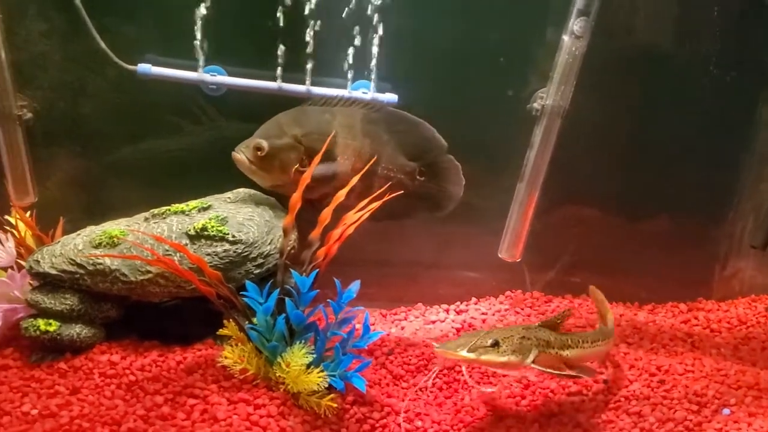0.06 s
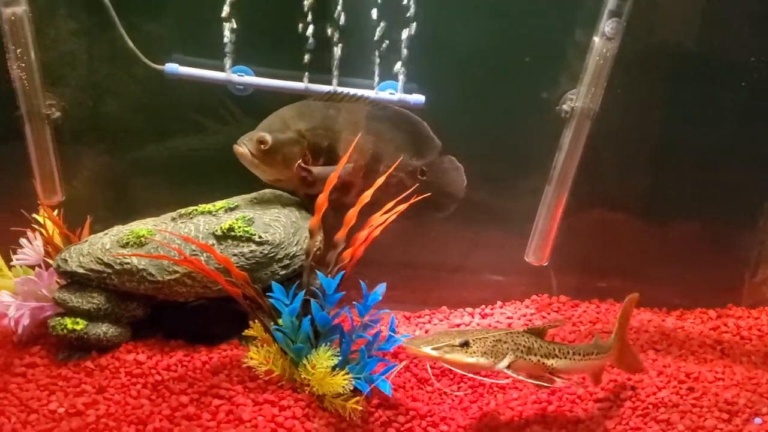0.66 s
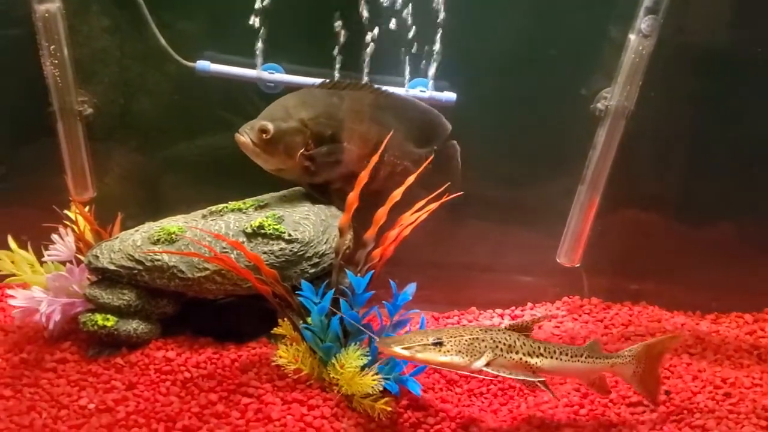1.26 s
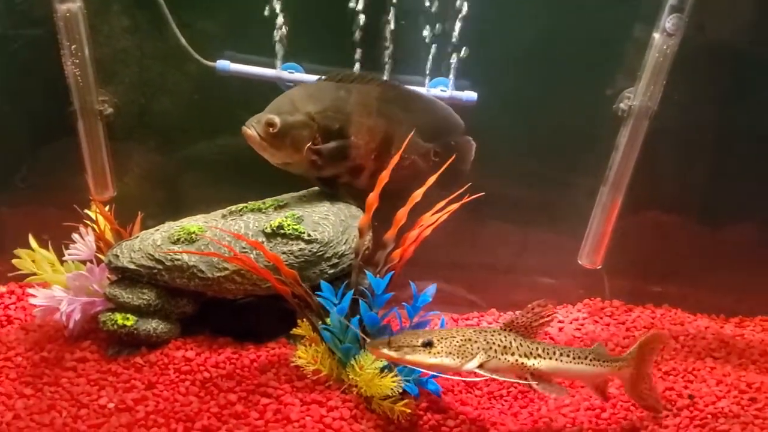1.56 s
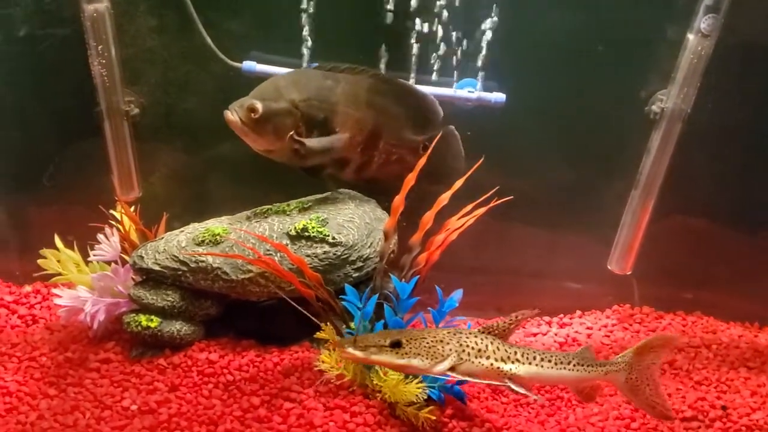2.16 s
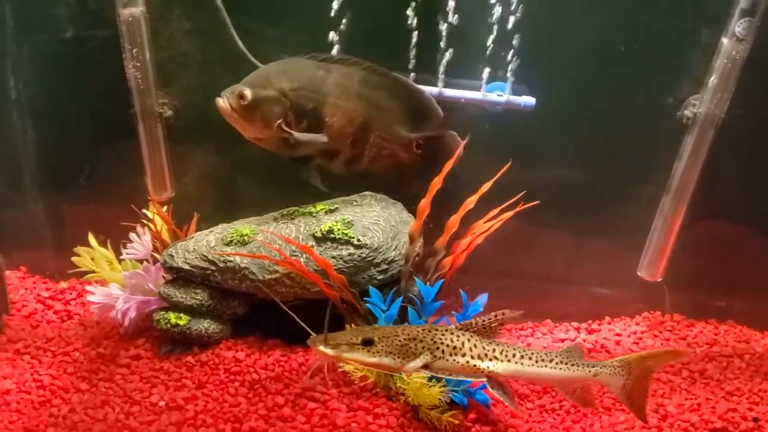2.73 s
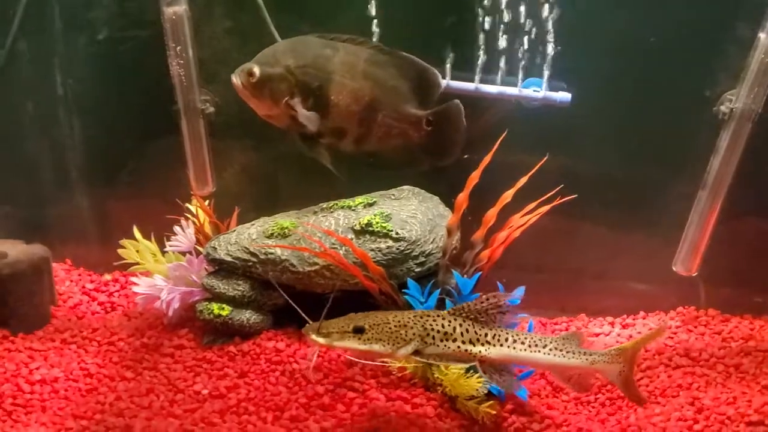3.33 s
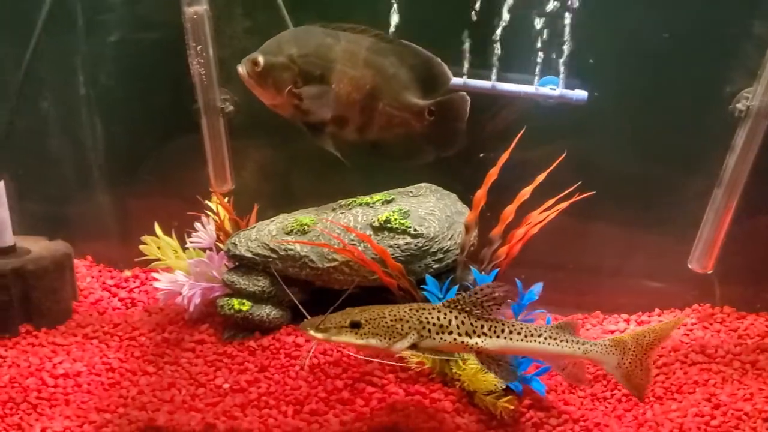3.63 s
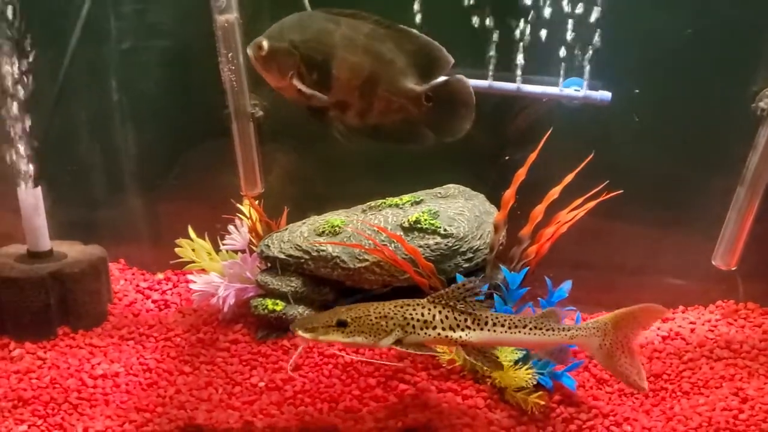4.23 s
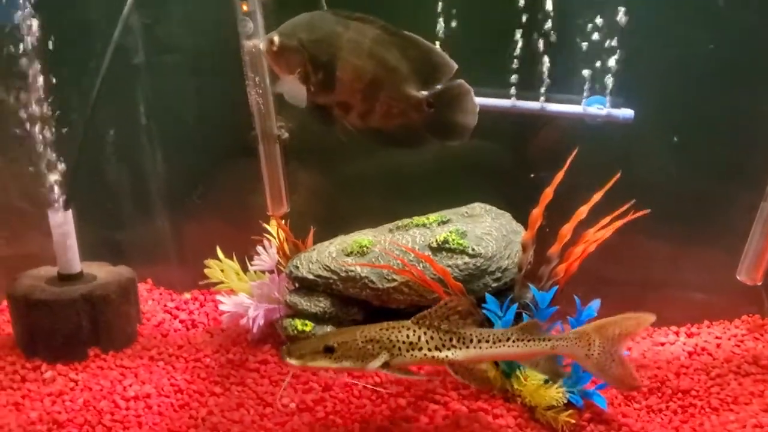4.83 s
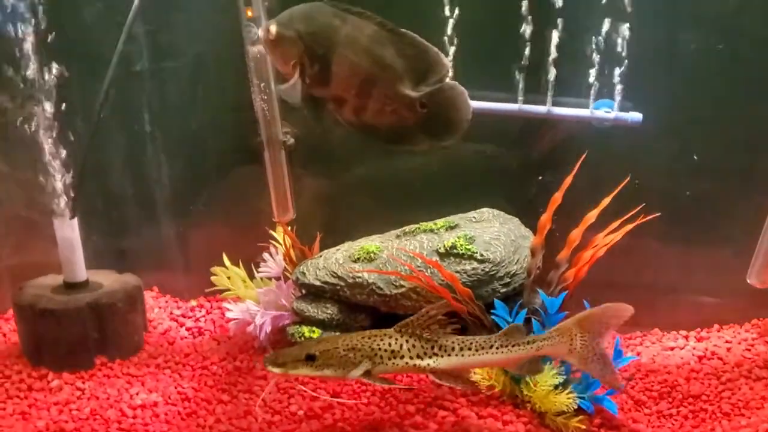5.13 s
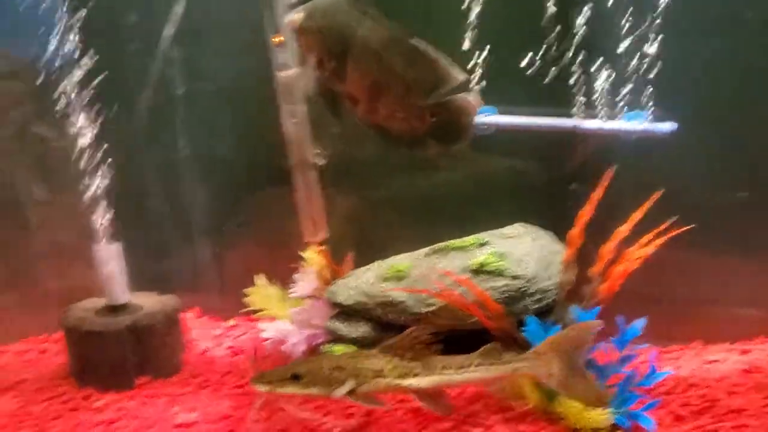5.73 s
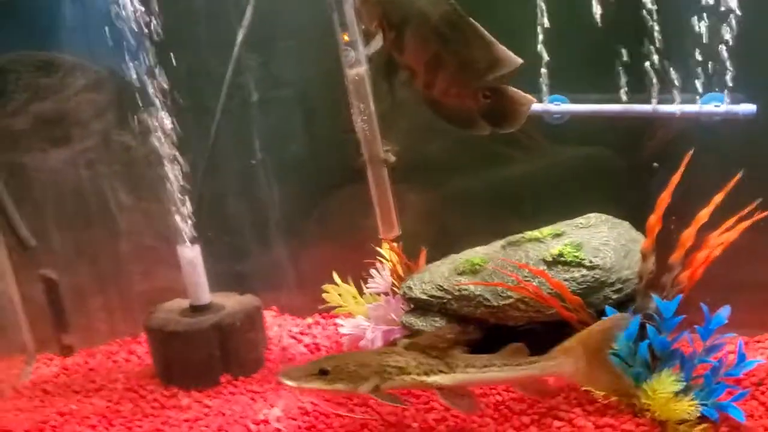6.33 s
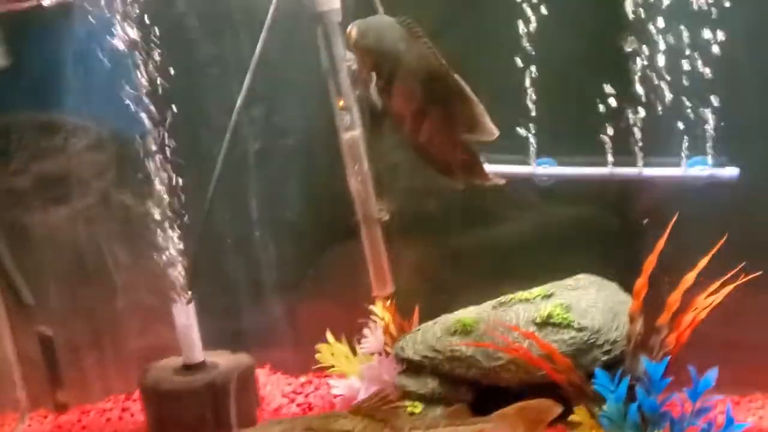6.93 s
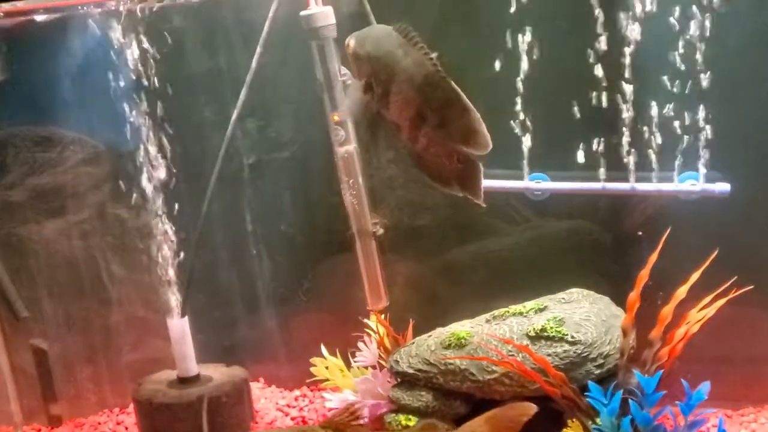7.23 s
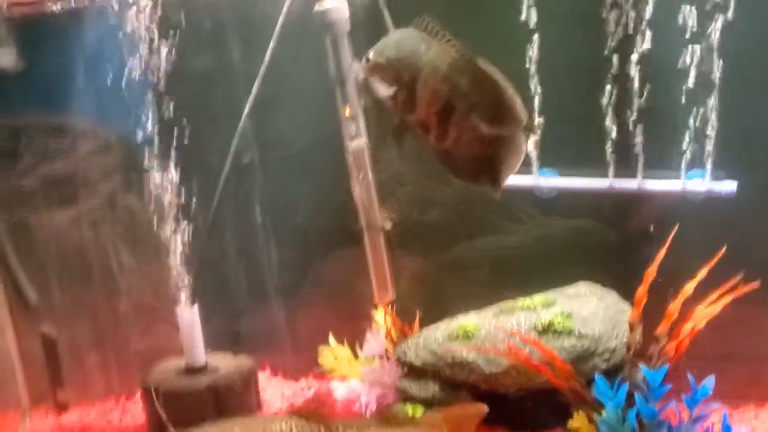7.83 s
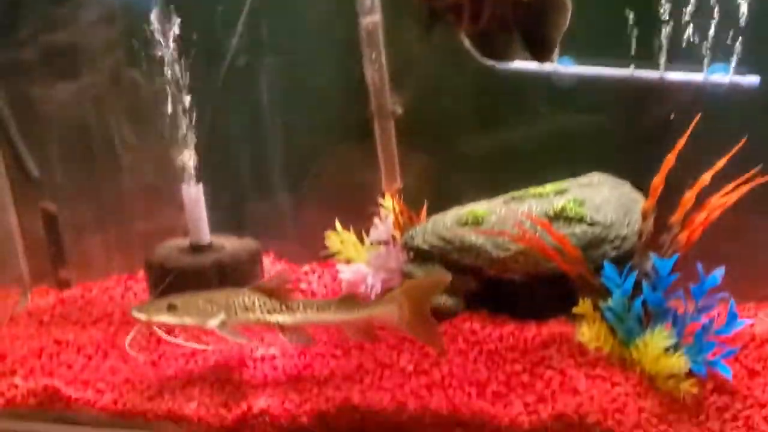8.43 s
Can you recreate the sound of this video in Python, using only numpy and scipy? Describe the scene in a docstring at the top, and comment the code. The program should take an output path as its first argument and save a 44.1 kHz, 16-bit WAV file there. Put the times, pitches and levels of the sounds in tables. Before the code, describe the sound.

Water bubbles steadily in a fish tank over a low pump hum, with one brief rustle and thump against the microphone.

```python
"""A fish tank's diaphragm air pump hums at mains rate and its housing buzzes, in a small room.
Air from the stones seethes at the surface, where single bubbles plink and spit.
Fingers slide on a hand-held camera, shift their grip with a rustle, and knock its case once.
The microphone hisses faintly."""
import sys
import numpy as np
from scipy import signal
from scipy.fft import rfft, irfft, next_fast_len
from scipy.io import wavfile

SR = 44100
rng = np.random.default_rng(int(sys.argv[2]) if len(sys.argv) > 2 else 0)


def wrap_up_sound(samples):
    """Save the sound to the file named by the first command line argument, as 16-bit audio."""
    columns = np.atleast_2d(samples).T
    # keep every value between -1 and 1, then stretch to whole-number steps
    tamed = np.clip(columns, -1, 1)
    steps = np.round(tamed * 32767).astype(np.int16)
    wavfile.write(sys.argv[1], SR, steps)


N = 377937
TIME = np.arange(N) / SR

# tank's gain at the moving camera: t/s, hum/dB, rattle/dB, water/dB
AIM = [(0, 0, .5, 0), (3, 0, 1.5, 0), (5.8, -.5, -1, -.5), (6.9, -2.5, -4.5, -2.5), (8.5, -2, -4.5, -1.5)]


def amp(db):
    return 10 ** (np.asarray(db) / 20)


def unit(x):
    return x / np.sqrt(np.mean(x ** 2) + 1e-20)


def read(points, hz):
    """Table lookup on a log-frequency axis."""
    f, value = np.transpose(points)
    return np.interp(np.log(hz + 1), np.log(f + 1), value)


def curves(rows):
    """Each dB column of a time table as gain per sample."""
    t_s, *columns = np.transpose(rows)
    return [amp(np.interp(TIME, t_s, db)) for db in columns]


def add(mix, t_s, sound):
    part = mix[:, round(t_s * SR):][:, :sound.shape[-1]]
    part += sound[..., :part.shape[1]]


def noise(size=N):
    return rng.standard_normal((2, size))


def wander(width, size=N):
    """Smooth noise, rms 1, changing over about width steps."""
    lowpass = np.exp(-(np.fft.rfftfreq(size) * width) ** 2)
    return unit(irfft(rfft(rng.standard_normal(size)) * lowpass, size))


def grains(per_s, spread_db):
    """Random clicks of uneven size."""
    size = amp(spread_db * np.minimum(rng.exponential(1, N), 4))
    return unit(noise() * size * (rng.random(N) < per_s / SR))


def colour(drive, spectrum, ripple_db=0):
    """Two independent drives to a shaped stereo pair, rms 1; ripple mimics narrow room resonances."""
    # left-right likeness: f/Hz, correlation
    likeness = [(100, .98), (220, .92), (400, .84), (700, .5), (1300, -.1), (2400, .15), (14000, .05)]
    size = drive.shape[1]
    padded = next_fast_len(size, True)
    hz = np.fft.rfftfreq(padded, 1 / SR)
    a, b = rfft(drive, padded)
    same = np.clip(read(likeness, hz), -1, 1)
    pair = np.array([a, same * a + np.sqrt(1 - same ** 2) * b])
    uneven_db = ripple_db * wander(70 * padded / SR, len(hz)) * np.minimum(hz / 500, 1)
    return unit(irfft(pair * amp(read(spectrum, hz) + uneven_db), padded)[:, :size])


def die_away(x):
    """Each band fades at the room's rate."""
    # room decay: f/Hz, t60/s
    room = [(60, 0.8), (300, 0.34), (2000, 0.35), (5000, 0.27), (14000, 0.25)]
    hz, t, bands = signal.stft(x, SR, nperseg=256)
    fade = amp(-60 * t / read(room, hz)[:, None])
    return signal.istft(bands * fade, SR, nperseg=256)[1][:, :x.shape[1]]


def in_room(sound, direct, size=8192):
    """Direct path per channel plus diffuse tail; rms 1 over the first 20 ms."""
    response = die_away(noise(size))
    response /= np.linalg.norm(response[0])
    response[[0, 1], rng.integers(0, 20, 2)] += direct
    out = signal.fftconvolve(sound[None], response, axes=1)
    return out / np.sqrt(np.mean(out[:, :SR // 50] ** 2))


def pump(mains_hz=60.004, waver_db=1.5, scatter_db=2.5, partials=120):
    """Mains-locked partials: steady low hum, and a housing rattle that wavers as the camera moves."""
    # diaphragm stroke: harmonic, level/dB
    stroke = [(1, -51), (2, -57), (3, -85.5), (4, -64.5), (5, -92.5), (6, -70)]
    # housing resonances: f/Hz, level per partial/dB
    housing = [(420, -86), (530, -75), (800, -82.5), (960, -84), (1100, -97), (1320, -77.5), (1470, -88.5),
               (1630, -75.5), (1850, -78.5), (2050, -91), (2300, -80.5), (2750, -95.5), (3650, -91.5),
               (4400, -92.5), (5000, -101), (5700, -98), (7200, -104)]
    hum, rattle, _ = curves(AIM)
    out, coarse_s = np.zeros((2, N)), np.linspace(0, TIME[-1], 256)
    fundamental, phasor = np.exp(2j * np.pi * mains_hz * TIME), np.ones(N)
    for k in range(partials):
        hz = (k + 1) * mains_hz
        phasor = phasor * fundamental
        db = stroke[k][1] if k < len(stroke) else read(housing, hz) + scatter_db * rng.standard_normal()
        high = min(hz / 1500, 1)
        waver = np.interp(TIME, coarse_s, amp(waver_db * (.1 + high) * wander(50, size=256)))
        # low partials peak together; shorter waves scatter and reach the two ports less in step
        phase = 2 * np.pi * rng.random() * min(hz / 400, 1) ** 4
        skew = np.array([[-1], [1]]) * high * rng.uniform(-1, 1) * np.pi / 3
        gain = amp(db) * waver * ((1 - high) * hum + high * rattle)
        out += gain * (phasor * np.exp(1j * (phase + skew))).real
    return out * np.sqrt(2)


def water(level_db=-55.5, flutter_db=0.5):
    """Countless small bursts merge into a seething wash, coloured by tank and room."""
    # surface spectrum: f/Hz, relative density/dB
    surface = [(20, -5.5), (45, 6.5), (110, 2.5), (220, -8), (370, -5), (510, -6), (680, -15.5),
               (880, -6.5), (1180, -8.5), (1450, -13), (1850, -10), (2800, -25.5), (4000, -27),
               (5200, -37.5), (9500, -40.5)]
    bursts = noise() + 0.46 * grains(900, spread_db=3)
    flutter = amp(flutter_db * wander(SR / 14))
    _, _, aim = curves(AIM)
    return amp(level_db) * colour(bursts * flutter, surface, ripple_db=1.2) * aim


def microphone_hiss(level_db=-72):
    """Steady self-noise."""
    # noise floor: f/Hz, relative density/dB
    floor = [(3000, -4), (6000, -1.5), (7800, -1.5), (9000, -11.5), (10800, -3), (12500, 2), (15800, -2.5)]
    return amp(level_db) * colour(noise(), floor)


def plink(hz, cycles, rise=0.033, size=4096):
    """Damped ring, 1/e after the given cycles; pitch rises slightly."""
    t = np.arange(size) / SR
    age = t * hz / cycles
    glide = 1 + rise * np.minimum(age, 4) / 2
    return np.sin(2 * np.pi * hz * t * glide) * np.exp(-age) * (1 - np.exp(-6 * age))


def bubbles(splash_db=-6, small_count=170, small_hz=2557, span_oct=1.9, small_db=-72, db_per_oct=-4):
    """Surfacing bubbles splash and ring; smaller ones are higher, fainter and ring for more cycles."""
    # large bubbles: t/s, f/Hz, level/dB
    large = [(0.241, 1890, -54.5), (0.382, 2230, -58.5), (0.744, 1560, -55), (1.109, 2380, -58),
             (1.22, 1950, -60), (1.804, 5230, -69), (1.917, 2400, -64), (2.249, 3450, -58.5),
             (2.566, 2100, -58.5), (3.397, 3190, -60.5), (3.549, 2660, -58), (4.146, 4300, -62),
             (4.411, 5900, -62.5), (4.823, 3040, -62.5), (4.994, 3120, -64), (5.26, 1750, -54),
             (5.312, 2950, -63), (5.743, 3970, -61.5), (5.745, 2480, -60), (8.37, 3070, -67)]
    out = np.zeros((2, N))
    when, smallness, luck = rng.random((small_count, 3)).T
    octaves = span_oct * smallness
    levels_db = small_db + db_per_oct * octaves + 2.5 * np.minimum(-np.log(luck), 3)
    small = zip(when * TIME[-1], small_hz * 2 ** octaves, levels_db)
    for t_s, hz, db in [*large, *small]:
        ring = plink(hz, cycles=np.sqrt(hz / 65))
        splash = amp(splash_db) * plink(1.25 * hz, cycles=1.1)
        add(out, t_s, amp(db) * in_room(ring + splash, direct=.75))
    return out


def swell(t_s, length_s, db):
    """Finger stroke envelope: speeds up quickly, eases off."""
    return amp(db) * np.sin(np.pi * np.clip((TIME - t_s) / length_s, 0, 1) ** 0.7)


def catches(decay_s, column):
    """Envelope of skin catching on an edge: sudden release, then decay."""
    # releases: t/s, scrape/dB, skin hiss/dB
    releases = [(5.923, -50, -69), (5.981, -52, -81), (6.124, -45, -80), (6.186, -52, -57),
                (6.222, -59, -59), (6.3, -45, -53), (6.366, -50, -49.5), (6.485, -60, -53.5)]
    return sum(amp(row[column]) * (TIME >= row[0]) * np.exp(-np.abs(TIME - row[0]) / decay_s)
               for row in releases)


def fingers(creep_db=-77.5, swing_db=9.5, swing_s=.08):
    """Skin hisses over the case: it creeps, catches and slides in strokes."""
    # finger strokes: t/s, length/s, level/dB
    strokes = [(0.506, 0.17, -62), (0.577, 0.5, -64.5), (1.51, 0.25, -66.5), (2.02, 0.2, -69),
               (2.768, 0.34, -64), (3.834, 0.43, -66.5), (7.235, 0.086, -61.5), (7.667, 0.059, -62),
               (7.795, 0.07, -66.5), (8.276, 0.1, -59)]
    # skin on plastic: f/Hz, relative density/dB
    skin = [(100, 6), (300, 21), (700, 3), (2000, 24.5), (4100, 20), (5100, 15.5), (8500, 14.5),
            (10700, 17), (13000, 14), (15800, 12)]
    creep = amp(creep_db + swing_db * np.tanh(wander(swing_s * SR)))
    speed = creep + catches(decay_s=.022, column=2) + sum(swell(*row) for row in strokes)
    slips = noise() * amp(wander(SR / 150))
    return speed * colour(slips, skin)


def grip(drag_gain_db=-2, scrape_gain_db=2):
    """The hand drags on the case in lumps and scrapes it in fine slips; finger pads bump it."""
    # grip shift: t/s, relative drag/dB, relative scrape/dB
    shift = [(5.86, -49, -59.5), (5.992, -35.5, -64.5), (6.042, -45.5, -62.5), (6.15, -31, -51.5),
             (6.288, -34.5, -53.5), (6.304, -35, -45.5), (6.414, -36.5, -54.5), (6.484, -39, -55.5),
             (6.62, -41, -50)]
    # scraped case: f/Hz, relative density/dB
    scraped = [(200, -16.5), (700, 3.5), (1400, -2.5), (1850, 7), (2500, -1), (3200, -2.5), (4500, -9.5),
               (6000, -15.5), (9000, -25), (15800, -36)]
    # shaken case: f/Hz, relative density/dB
    shaken = [(30, -24.5), (60, -3), (95, 3), (170, -2.5), (230, -9), (310, -16.5), (470, -13.5),
              (600, -27.5), (1200, -31.5), (3000, -54.5), (8000, -92.5)]
    # pad bumps: t/s, f/Hz, relative level/dB
    nudges = [(1.559, 315, -48.5), (2.896, 246, -48), (5.445, 221, -49), (5.938, 180, -39.5),
              (6.123, 95.4, -30.5), (6.178, 137.6, -31), (6.38, 113, -25)]
    drag, scrape = curves(shift)
    gate = np.interp(TIME, [5.85, 5.9, 6.63, 6.66], [0, 1, 1, 0])
    scuff = swell(t_s=0.52, length_s=0.087, db=-55.5)  # the first stroke also scrapes
    force = amp(scrape_gain_db) * scrape * gate + catches(decay_s=0.016, column=1) + scuff
    slips = noise() * amp(2 * wander(SR / 200)) + grains(2000, spread_db=2.5)
    out = force * colour(slips, scraped)
    out += amp(drag_gain_db) * drag * gate * colour(noise(), shaken)
    for t_s, hz, db in nudges:
        add(out, t_s, 2 * amp(db) * plink(hz, cycles=3.2))
    return out


def spits(gain_db=-1, decay_s=0.0049, faint_count=14, faint_db=-74, spread_db=7):
    """Bubble films burst with a bright tick; faint ones come at random."""
    # loudest bursts: t/s, relative level/dB
    loudest = [(0.878, -67), (1.052, -57), (1.338, -68), (1.802, -63), (3.981, -62), (4.759, -63),
               (5.176, -61)]
    # tick spectrum: f/Hz, relative density/dB
    film = [(2000, -44), (5000, 0.5), (8500, 6.5), (10400, 19), (12500, 12), (15800, -58)]
    out, t = np.zeros((2, N)), np.arange(1024) / SR
    faint = [(when * TIME[-1], faint_db + spread_db * loud)
             for when, loud in rng.random((faint_count, 2))]
    for t_s, db in [*loudest, *faint]:
        tick = colour(noise(t.size), film)[0] * np.exp(-t / decay_s)
        add(out, t_s, amp(db + gain_db) * in_room(tick, direct=1.0))
    return out


def modes(table, rise_s=.0005, size=16384):
    """Decaying sines of a struck body."""
    t = np.arange(size) / SR
    onset = 1 - np.exp(-(t / rise_s) ** 2)
    return onset * sum(amp(db - 60 * t / t60) * np.sin(2 * np.pi * hz * t) for hz, db, t60 in table)


def knock(tail_db=-15, tail_rise_s=0.0033, crack_decay_s=0.011):
    """A quick chatter: each contact rings the case, cracks and jolts the camera; a diffuse ring follows."""
    # contacts: t/s, case gain/dB, crack gain/dB, thud gain/dB
    contacts = [(6.6333, -11.5, -29.5, -20), (6.6378, -18, -16.5, -26.5), (6.6416, -7, -21, -10.5),
                (6.6466, -8, -26, -17.5), (6.6542, -12, -39.5, -10)]
    # case modes: f/Hz, level/dB, t60/s
    case = [(1516, -7, 0.13), (1913, -2, 0.091), (2073, -5, 0.057), (2540, -12, 0.0444),
            (4550, -24, 0.0336)]
    # contact crack: f/Hz, relative density/dB
    crack = [(300, 3.5), (1100, 1.5), (2000, 5.5), (3200, -8), (4400, 6.5), (5500, -3), (8800, -10.5),
             (10500, -5), (15800, -17)]
    # camera bouncing in the hand: f/Hz, level/dB, t60/s
    bounce = [(71.8, -9.5, 0.37), (119.6, -0.5, 0.22), (188.5, -8, 0.15), (323, -11, 0.11),
              (503.7, -9, 0.19)]
    # diffuse ring: f/Hz, relative density/dB
    ring = [(30, -2), (60, 4.5), (150, -8), (250, -5), (400, -1), (750, -4.5), (1150, -7.5), (1600, -4),
            (2050, -0.5), (3100, -9), (4400, -14), (5300, -17), (8800, -24.5), (10500, -24), (15800, -28.5)]
    out, t = np.zeros((2, N)), np.arange(32768) / SR
    for t_s, case_db, crack_db, thud_db in contacts:
        add(out, t_s, amp(case_db) * modes(case) * np.array([[.85], [1]]))
        add(out, t_s, amp(crack_db) * colour(noise(t.size), crack) * np.exp(-t / crack_decay_s))
        add(out, t_s, amp(thud_db) * modes(bounce))
    tail = die_away(colour(noise(t.size), ring)) * (1 - np.exp(-t / tail_rise_s))
    add(out, contacts[1][0], amp(tail_db) * tail * np.array([[.9], [1.1]]))
    return out


def scene(lag_samples=22):
    """Tank, hand and hiss; grip and knock are nearer the right port, so the left lags."""
    hiss = microphone_hiss()
    left, right = grip() + knock()
    hand = np.array([np.roll(left, lag_samples), right])
    return pump() + water() + bubbles() + spits() + fingers() + hand + hiss


def record(dry, bass_cut_hz=35, ceiling=.8, edge_hz=15850):
    """Microphone bass cut and soft overload, then a band limit."""
    thinned = signal.sosfilt(signal.butter(2, bass_cut_hz, "high", fs=SR, output="sos"), dry)
    rounded = thinned / (1 + (thinned / ceiling) ** 4) ** .25
    lowpass = signal.firwin(511, edge_hz, window=("kaiser", 9), fs=SR)
    return signal.oaconvolve(rounded, lowpass[None], "same")


dry = scene()
out = record(dry)
wrap_up_sound(out)
```